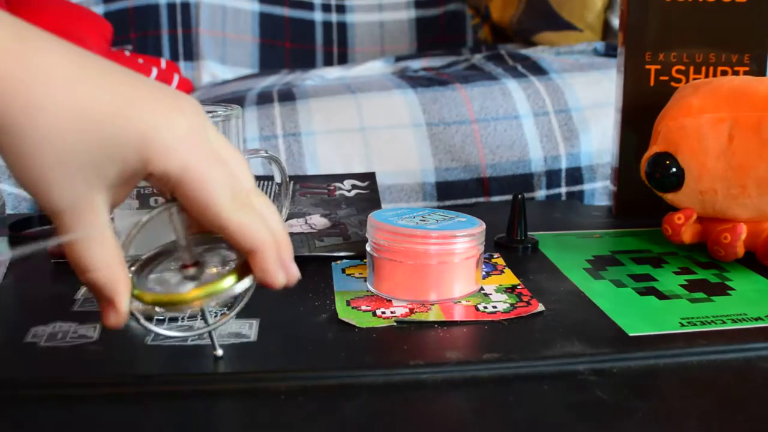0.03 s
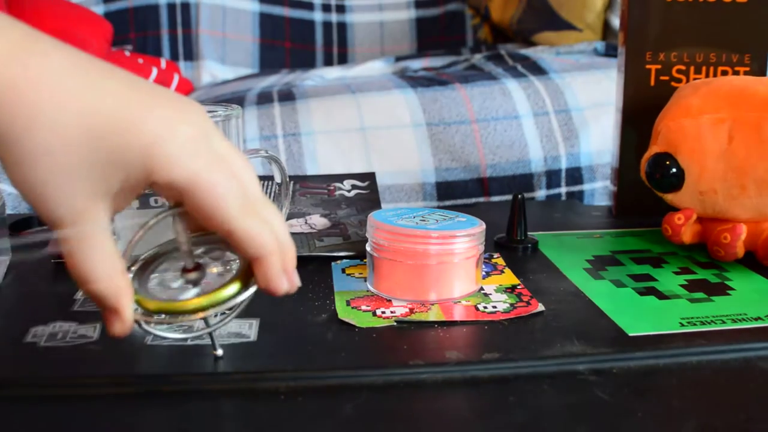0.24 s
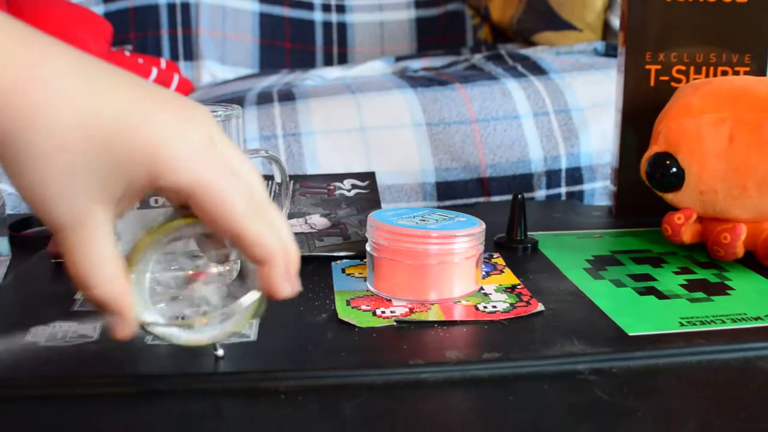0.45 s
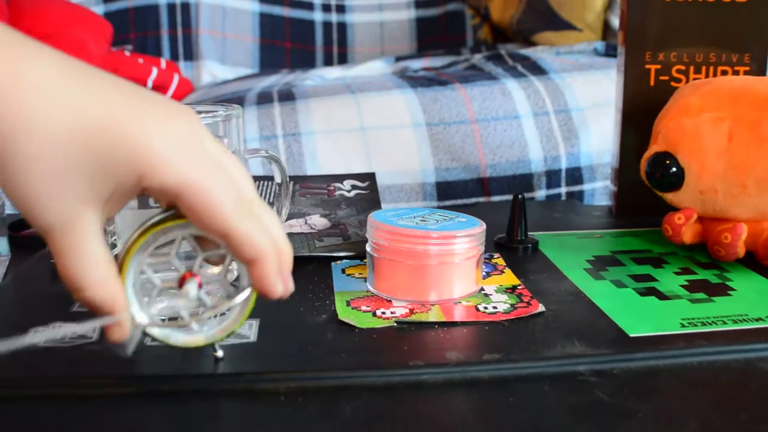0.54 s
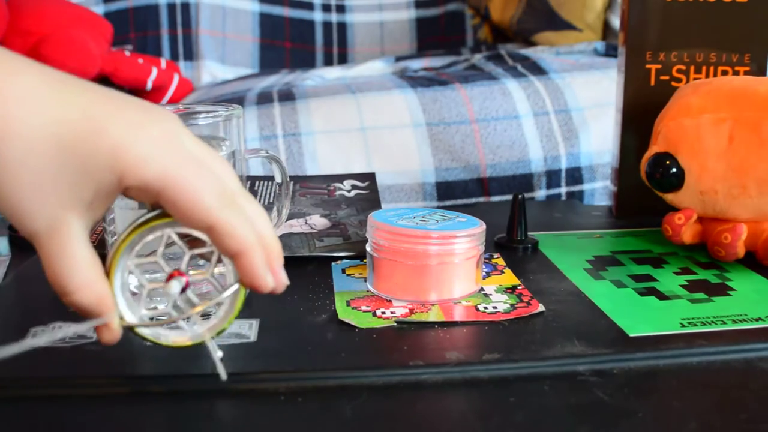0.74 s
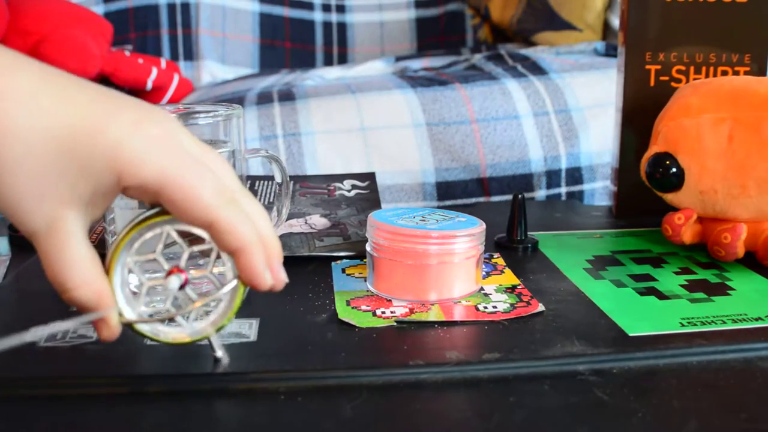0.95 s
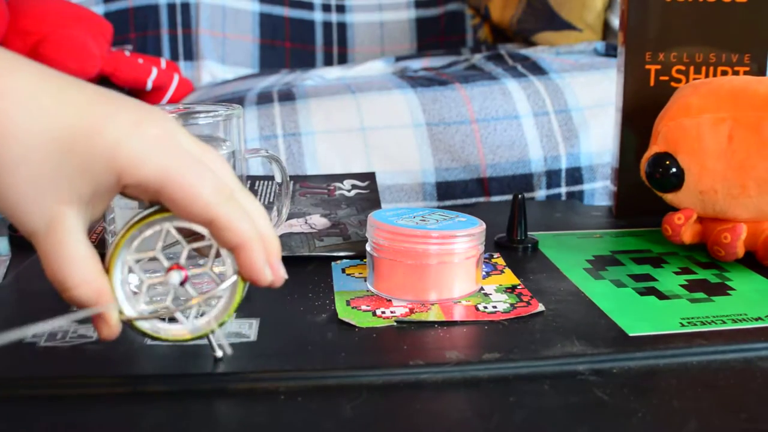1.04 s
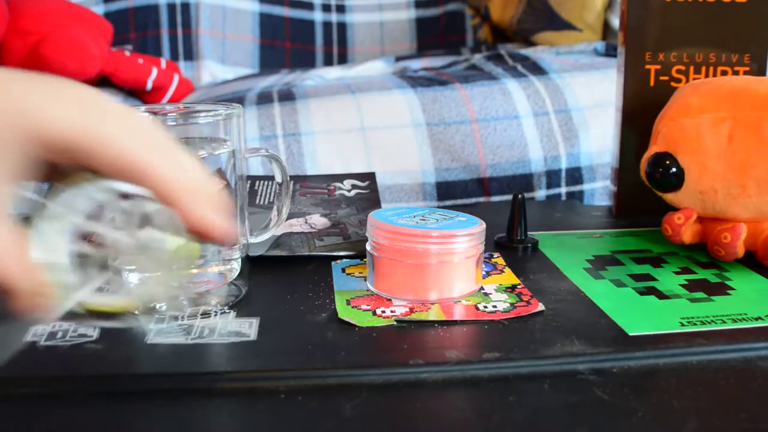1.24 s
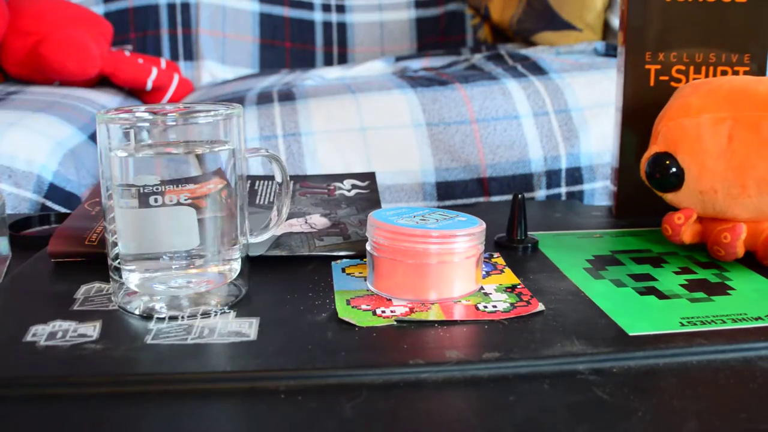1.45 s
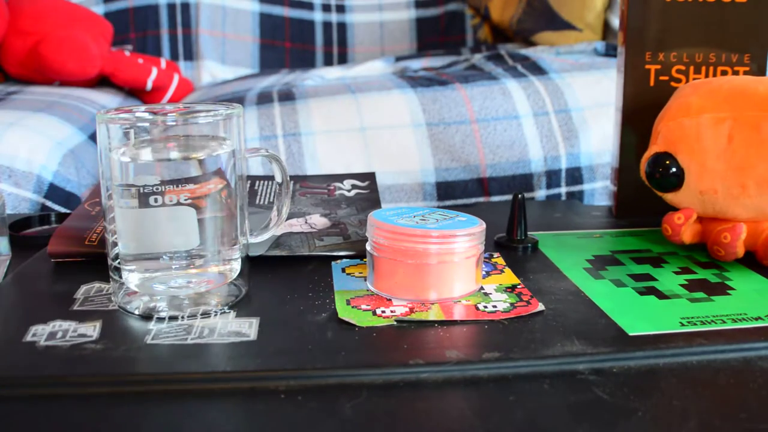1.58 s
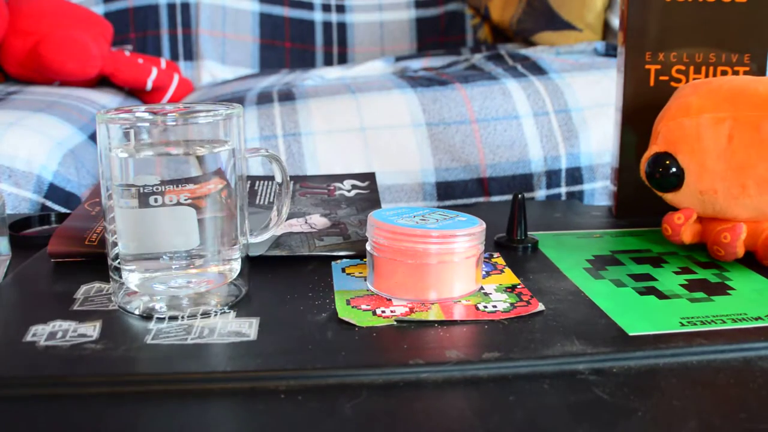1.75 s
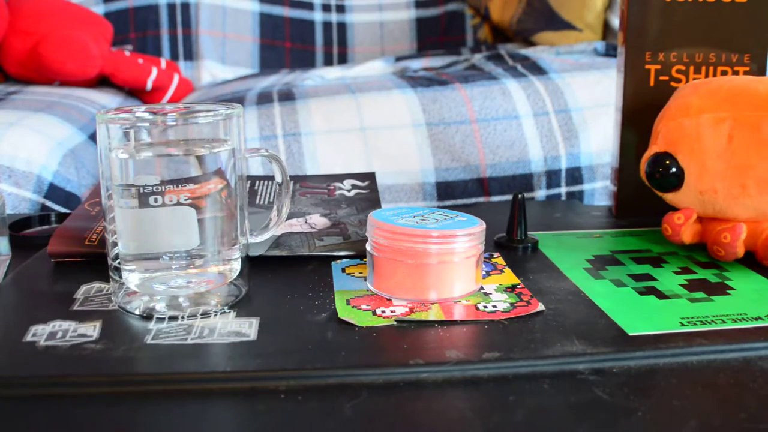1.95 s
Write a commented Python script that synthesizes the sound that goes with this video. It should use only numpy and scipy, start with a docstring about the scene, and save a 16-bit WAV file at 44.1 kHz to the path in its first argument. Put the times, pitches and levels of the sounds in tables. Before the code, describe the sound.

Small metal gyroscope clattering onto a tabletop, then clinking and ringing briefly as it is lifted.

```python
"""Toy gyroscope toppling.

The toy scrapes on a hard table under a hand, topples and clatters onto its side.
It bumps softly as it is gripped, then is lifted: the loose wheel clinks in its frame
with a high, short ring. Small quiet room; the near microphone clips on the hardest blows."""
import sys
import numpy as np
from scipy import signal
from scipy.fft import rfft, irfft, next_fast_len
from scipy.io import wavfile
from scipy.ndimage import map_coordinates

SR = 44100
rng = np.random.default_rng(int(sys.argv[2]) if len(sys.argv) > 2 else 0)


def transcribe(u):
    """Save the signal u as a 16-bit wav file named by the first command-line argument.

    u: samples, shape (n,) or (channels, n), limited to [-1, 1]; the rate is SR.
    q: integer samples, one column per channel.
    """
    v = np.clip(np.atleast_2d(u).T, -1, 1)
    q = np.round(v * 32767).astype(np.int16)
    wavfile.write(sys.argv[1], SR, q)


N = 88640
T = np.arange(N) / SR

# Frame rubbing on the table. Each row: time in seconds, hiss in dB, judder in dB.
SCRAPE_LEVELS = [(0, -54, -56), (0.034, -51, -46), (0.061, -40, -42.5), (0.114, -44, -52.5),
                 (0.135, -48.5, -49.5), (0.163, -42, -44.5), (.19, -47.5, -43.5), (.243, -52.5, -36),
                 (0.253, -24, -34.5), (0.27, -25, -26), (0.28, -34, -32.5), (0.307, -44.5, -37.5),
                 (0.35, -63, -45.5), (.362, -27, -38.5), (.41, -27, -27), (0.444, -42.5, -35.5),
                 (.475, -53, -53.5), (.6, -69.5, -60.5), (.9, -75, -74.5)]
# Scrape spectra. Each row: frequency in Hz, relative gain in dB.
HISS_EQ = [(300, -12.5), (1000, -10), (1700, 2.5), (2250, 0), (2500, 6), (2850, -3), (4300, -4), (6000, -4),
           (8300, -3), (9500, 4.5), (11000, -4.5), (15500, -16.5)]
JUDDER_EQ = [(40, -27), (110, -0.5), (240, 4.5), (520, -2.5), (750, -6), (1200, -11.5), (2000, -14.5),
             (6000, -48)]

# Blows on the table. Each row: start in seconds, then crack, thud, tock and clank in
# relative dB, contact time in seconds.
BLOWS = [(0.0432, -38, -27, -46, -68.5, 0.0014), (0.198, -30, -34, -34.5, -58.5, .001),
         (0.2483, -9, -23.5, -25.5, -26, 0.0018), (0.264, -24, -29.5, -30, -45, 0.00099),
         (0.2869, -16, -32.5, -29.5, -50.5, .0007), (0.291, -28.5, -20, -31, -50.5, .001),
         (0.357, -3.5, -5.5, -12, 2, 0.0018), (0.364, -10.5, -25, -22, -29.5, .001),
         (0.38, -13.5, -33, -33.5, -11.5, 0.0017), (0.4004, -17, -26, -27.5, -19, 0.0023),
         (0.4031, -9.5, -20.5, -16, -11, 0.00089)]
# Blow spectra. Each row: frequency in Hz, relative gain in dB.
CRACK_EQ = [(200, -13), (1200, 0), (1900, -6.5), (3000, -9), (4150, -1), (5400, -7.5), (7500, 2),
            (9400, 3.5), (11000, -3.5), (15500, -14)]
THUD_EQ = [(40, -44.5), (120, -25), (300, -9.5), (500, 3.5), (700, -8), (950, -10), (1700, -27),
           (9000, -65)]
TOCK_EQ = [(100, -35), (550, -6), (800, -6), (1000, 1.5), (1300, 4.5), (1750, -17), (2300, -9),
           (3500, -25.5), (12000, -50)]
# Struck modes. Each row: frequency in Hz, relative level in dB, T60 in seconds.
TABLETOP_MODES = [(343, -19.5, 0.079), (450, -12.5, 0.018), (506, -17, 0.11), (580, -17.5, 0.12)]
FRAME_MODES = [(3840, -15.5, 0.04), (4188, -13, 0.025), (3986, -10.5, 0.015)]
WHEEL_HUM_MODES = [(212.3, -37.5, 0.7), (937, -62.5, 2.9), (1650, -66.5, 1.8)]

# Wheel hitting its frame. Each row: start in seconds, click in relative dB, click emphasis in Hz,
# then main, side and high modes in relative dB, high-mode tilt in dB/octave,
# low mode in relative dB, finger damping in dB/s.
WHEEL_HITS = [(.3628, -23, 9540, -4, -41, -4, -16, -41, 506),
              (.4005, -10.5, 9300, -39, -56, -23, -11, -34, 414),
              (.553, -57, 10000, -61.5, -69.5, -53, -12.5, -69, 102),
              (1.2545, -13, 12700, -4.5, -15, 1.5, 3, -37, 593),
              (1.264, -11.5, 9720, -9.5, -36, -16, 30, -50, 32),
              (1.307, -17.5, 13200, -15, -46, -31, 12, -54, 291),
              (1.351, -41.5, 9080, -27, -58, -54, -12, -48.5, 193),
              (1.407, -22.5, 8430, -16, -33, -35, -1, -54, 186),
              (1.4735, -24, 8300, -18.5, -27.5, -20, 11, -36, 210),
              (1.488, -27.5, 8600, -26.5, -41, -39, 12, -50, 21),
              (1.742, -56.5, 9000, -62.5, -71.5, -58.5, 0.5, -74.5, 26.5),
              (1.963, -55.5, 9400, -64, -68, -58, -10.5, -73.5, 59.5)]
# High steel modes. Each row: free frequency in Hz, relative level in dB, T60 in seconds,
# rise at full grip in Hz.
HIGH_MODES = [(9880, -17.5, 0.05, 40), (9480, -8.5, .12, 230), (11650, -18.5, 0.043, 47),
              (13200, -32, .1, 600), (13800, -27.5, 0.13, 200), (16200, -24, .11, 120)]
# Hand grip. Each row: time in seconds, tightness from 0 to 1.
GRIP_TIGHTNESS = [(.36, .7), (.56, .6), (1.25, .34), (1.36, .34), (1.406, .13), (1.47, 0), (1.75, 0),
                  (1.96, 1)]
# Ring swell as the toy turns. Each row: time in seconds, gain in dB.
RING_SWELL = [(1.266, 1), (1.279, -2.5), (1.292, 5), (1.307, 1.5), (1.32, 8), (1.34, 2), (1.35, -11),
              (1.362, -9), (1.45, 4), (1.468, -12.5), (1.51, 2.5), (1.547, -10.5), (1.562, -0.5),
              (1.582, 8.5), (1.615, -11), (1.64, 1), (1.67, 6.5), (1.695, -6.5), (1.73, 4)]
# Click spectrum. Each row: frequency in Hz, relative gain in dB.
CLICK_EQ = [(100, -34.5), (900, -34), (2100, -16), (2800, -17.5), (4400, -18), (6000, -15), (7500, -13),
            (8300, -7), (9500, 0.5), (10400, -3.5), (11200, -8), (12000, -8.5), (13200, -10), (15800, -18)]

# Bumps of the held toy. Each row: start in seconds, then thump and tap in relative dB.
SOFT_BUMPS = [(.502, -46, -50), (.612, -48.5, -61), (1.027, -46.5, -51.5), (1.070, -46.5, -62),
              (1.078, -30.5, -42), (1.0833, -31, -42), (1.1, -39.5, -57), (1.13, -48.5, -69.5),
              (1.188, -71.5, -51), (1.743, -61.5, -54.5)]
# Bump spectra. Each row: frequency in Hz, relative gain in dB.
THUMP_EQ = [(40, -30), (140, -14.5), (270, 5.5), (400, -7.5), (560, -2.5), (690, -16), (850, -10),
            (1500, -37), (9000, -53)]
TAP_EQ = [(100, -37), (800, -8.5), (1350, 7), (1750, -2.5), (2100, -20.5), (3800, -19.5), (15000, -30.5)]

# Rasping slips. Each row: start in seconds, relative level in dB.
RASP_SLIPS = [(1.26, -43), (1.456, -40), (1.475, -38)]
# Rasp spectrum. Each row: frequency in Hz, relative gain in dB.
RASP_EQ = [(1400, -34.5), (2100, -6), (2450, -19.5), (2790, 4.5), (3100, -27.5), (5000, -42)]

# Room decay. Each row: frequency in Hz, T60 in seconds.
ROOM_DECAY = [(100, 0.05), (500, 0.42), (3000, 0.24), (9000, 0.2), (16000, 0.062)]
# Background spectrum. Each row: frequency in Hz, relative gain in dB.
BACKGROUND_EQ = [(15, -31.5), (25, -6.5), (64, 2), (149, -13.5), (185, -7.5), (285, -24), (489, -17),
                 (1190, -19), (1330, -21.5), (1520, -20), (16000, -30)]


def amp(db):
    """Decibels to gain."""
    return 10 ** (np.asarray(db) / 20)


def unit_rms(x):
    """Scale to RMS 1."""
    return x / np.sqrt(np.mean(x ** 2) + 1e-20)


def log_interp(points, hz):
    """Interpolate (Hz, value) points over log frequency."""
    point_hz, values = np.transpose(points)
    return np.interp(np.log(hz + 1), np.log(point_hz), values)


def colour(x, eq):
    """Minimum-phase filter through (Hz, dB) points; keeps white-noise power."""
    size = 4096
    gain = unit_rms(amp(log_interp(eq, np.fft.rfftfreq(size, 1 / SR))))
    cepstrum = irfft(np.log(gain + 1e-6))
    cepstrum[1:size // 2] *= 2
    cepstrum[size // 2 + 1:] = 0
    return signal.fftconvolve(x, irfft(np.exp(rfft(cepstrum))))[:N]


def add(track, start_s, x):
    """Mix x in from start_s."""
    i = int(np.clip(round(start_s * SR), 0, N - 1))
    track[i:] += x[:N - i]


def decay(t60_s, hold_s=0):
    """Envelope: hold, then fall 60 dB per t60_s."""
    return np.exp(-np.log(1000) * np.maximum(T - hold_s, 0) / t60_s)


def burst(t60_s, hold_s=0):
    """Noise held through a contact, then decaying."""
    return rng.standard_normal(N) * decay(t60_s, hold_s)


def impact(t60_s, hold_s, tail_share=0.35):
    """Clean impulse plus a diffuse tail carrying tail_share of the energy."""
    tail = burst(t60_s, hold_s)
    impulse = np.linalg.norm(tail) * (T == 0)
    return np.sqrt(tail_share) * tail + np.sqrt(1 - tail_share) * impulse


def ring(modes):
    """Damped sines, each with 1 dB of random level spread."""
    return sum(amp(db + rng.normal(0, 1)) * decay(t60_s) * np.sin(2 * np.pi * hz * T)
               for hz, db, t60_s in modes)


def scrape(slips_per_s=2900, spread_db=2.5):
    """Dense tiny slips of metal on the table: hiss, plus low judder of the board."""
    times_s, hiss_db, judder_db = np.transpose(SCRAPE_LEVELS)
    sound = np.zeros(N)
    for level_db, eq in (hiss_db, HISS_EQ), (judder_db, JUDDER_EQ):
        slips = (rng.random(N) < slips_per_s / SR) * rng.choice([-1, 1], N)
        slips = unit_rms(slips * amp(spread_db * rng.standard_normal(N)))
        sound += colour(slips * amp(np.interp(T, times_s, level_db)), eq)
    return sound


def knocks(fall_s=0.357):
    """Blows crack at the contact, thud the tabletop, clank the frame. The fall sets the wheel humming."""
    crack, thud, tock, tones = np.zeros((4, N))
    for start_s, crack_db, thud_db, tock_db, clank_db, contact_s in BLOWS:
        add(crack, start_s, amp(crack_db) * burst(t60_s=0.012, hold_s=contact_s))
        add(thud, start_s, amp(thud_db - 5) * impact(t60_s=0.11, hold_s=contact_s))
        add(tock, start_s, amp(tock_db) * impact(t60_s=0.049, hold_s=contact_s))
        add(tones, start_s, amp(thud_db) * ring(TABLETOP_MODES))
        add(tones, start_s, amp(clank_db) * ring(FRAME_MODES))
    add(tones, fall_s, ring(WHEEL_HUM_MODES))
    return colour(crack, CRACK_EQ) + colour(thud, THUD_EQ) + colour(tock, TOCK_EQ) + tones


def wheel_ring(modes, grip, length_s, full_grip_waver_db=5.5, wavers_per_s=90, ramp_s=0.0011):
    """Steel modes go sharp and waver in level under grip; a free wheel rings smoothly."""
    t = T[:int(length_s * SR)]
    tone = np.zeros(N)
    for free_hz, db, db_per_s, rise_hz in modes:
        waver = map_coordinates(rng.standard_normal(128), [t * wavers_per_s], mode="wrap")
        waver *= np.minimum(t * wavers_per_s, 1)
        level_db = db + full_grip_waver_db * grip * waver - db_per_s * t
        hz = free_hz + grip * rise_hz
        tone[:len(t)] += amp(level_db) * np.sin(2 * np.pi * (hz * t + rng.random()))
    return tone * np.clip(np.minimum(T, t[-1] - T) / ramp_s, 0, 1)


def click(spot_hz, boost_db=8.5, width_octaves=0.37):
    """Steel-on-steel click; each contact point favours its own band."""
    ratio = 2 ** width_octaves
    spot_eq = [(spot_hz / ratio, 0), (spot_hz, boost_db), (spot_hz * ratio, 0)]
    return colour(burst(t60_s=0.022, hold_s=0.00079), spot_eq)


def clinks(overlap_s=0.002):
    """Wheel hits frame: each hit clicks, stops the last ring, starts a new one. Turning swells it."""
    main_hz, main_t60_s, main_rise_hz = 9313, 0.45, 86
    side_hz, side_t60_s, side_rise_hz = 8200, 0.28, 150
    low_hz, low_t60_s, low_rise_hz = 3435, 0.72, 150
    clicks, rings = np.zeros((2, N))
    ends_s = [hit[0] for hit in WHEEL_HITS[1:]] + [N / SR]
    for hit, end_s in zip(WHEEL_HITS, ends_s):
        start_s, click_db, spot_hz, main_db, side_db, high_db, db_per_octave, low_db, damp_db_per_s = hit
        modes = [(main_hz, main_db, 60 / main_t60_s + damp_db_per_s, main_rise_hz),
                 (side_hz, side_db, 60 / side_t60_s + damp_db_per_s, side_rise_hz),
                 (low_hz, low_db, 60 / low_t60_s + damp_db_per_s, low_rise_hz)]
        for hz, db, t60_s, rise_hz in HIGH_MODES:
            tilt_db = db_per_octave * np.log2(hz / main_hz)
            modes.append((hz, db + high_db + tilt_db, 60 / t60_s, rise_hz))
        grip = np.interp(start_s, *np.transpose(GRIP_TIGHTNESS))
        add(rings, start_s, wheel_ring(modes, grip, end_s - start_s + overlap_s))
        add(clicks, start_s, amp(click_db) * click(spot_hz))
    swell = amp(np.interp(T, *np.transpose(RING_SWELL)))
    return rings * swell + colour(clicks, CLICK_EQ)


def bumps():
    """Finger-cushioned contacts: dull, no ring."""
    thump, tap = np.zeros((2, N))
    for start_s, thump_db, tap_db in SOFT_BUMPS:
        add(thump, start_s, amp(thump_db - 2) * impact(t60_s=0.061, hold_s=0.0017))
        add(tap, start_s, amp(tap_db) * impact(t60_s=0.043, hold_s=0.00088))
    return colour(thump, THUMP_EQ) + colour(tap, TAP_EQ)


def rasps(rise_s=0.0047):
    """Faint rasp with a soft onset at each slip."""
    noise = np.zeros(N)
    onset = 1 - np.exp(-T / rise_s)
    for start_s, db in RASP_SLIPS:
        add(noise, start_s, amp(db) * burst(t60_s=0.064) * onset)
    return colour(noise, RASP_EQ)


def room(x, build_s=0.013):
    """Short diffuse tail, longest in the low mids."""
    hz, times_s, spectrum = signal.stft(rng.standard_normal(SR // 2), SR, nperseg=256)
    spectrum = spectrum * amp(-60 * times_s / log_interp(ROOM_DECAY, hz)[:, None])
    tail = signal.istft(spectrum, SR, nperseg=256)[1]
    tail *= np.clip(np.arange(len(tail)) / SR / build_s, 0, 1)
    return signal.fftconvolve(x, tail / np.linalg.norm(tail))[:N]


def scene(table_send_db=-25, metal_send_db=-17.5, background_db=-60.5):
    """Mono mix: toy, reverb, quiet background."""
    table = knocks() + bumps() + scrape()
    metal = clinks() + rasps()
    background = amp(background_db) * unit_rms(colour(rng.standard_normal(N), BACKGROUND_EQ))
    reverb = room(amp(table_send_db) * table + amp(metal_send_db) * metal)
    return (table + metal + reverb + background)[None]


def record(dry):
    """Microphone input: clip the hardest blows, cut deep bass, limit the band."""
    clip_level, low_cut_hz, top_hz, edge_hz = 0.92, 58, 16200, 600
    oversampled = signal.resample_poly(dry, 4, 1, axis=-1)
    clipped = signal.resample_poly(np.clip(oversampled, -clip_level, clip_level), 1, 4, axis=-1)
    highpassed = signal.sosfilt(signal.butter(2, low_cut_hz, "high", fs=SR, output="sos"), clipped)
    size = next_fast_len(N + SR // 2)
    hz = np.fft.rfftfreq(size, 1 / SR)
    rolloff = np.sin(np.pi / 2 * np.clip((top_hz - hz) / edge_hz, 0, 1)) ** 2
    return irfft(rfft(highpassed, size) * rolloff, size)[..., :N]


dry = scene()
out = record(dry)
transcribe(out)
```